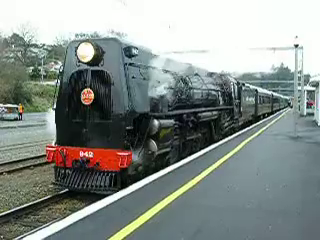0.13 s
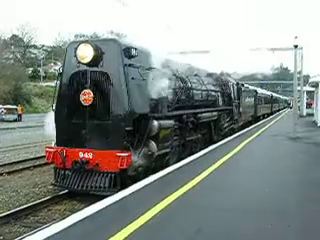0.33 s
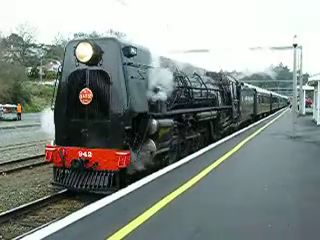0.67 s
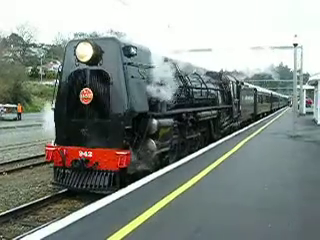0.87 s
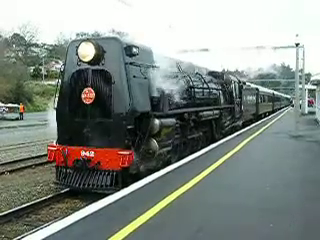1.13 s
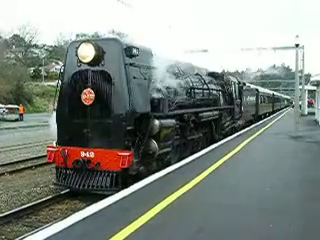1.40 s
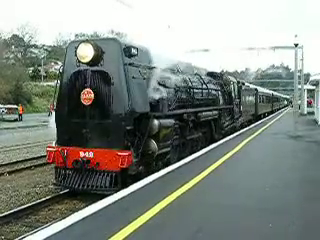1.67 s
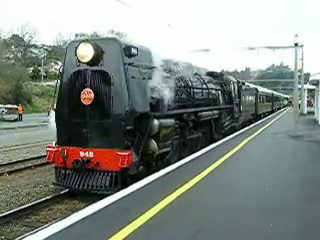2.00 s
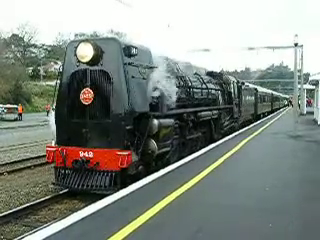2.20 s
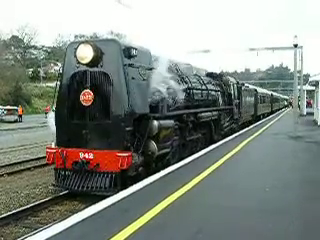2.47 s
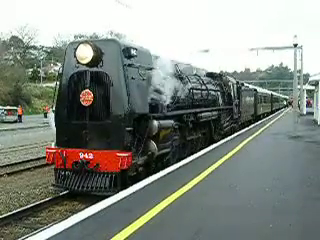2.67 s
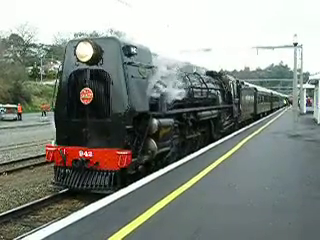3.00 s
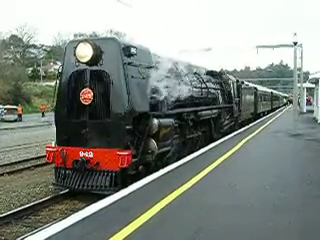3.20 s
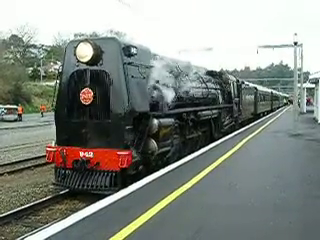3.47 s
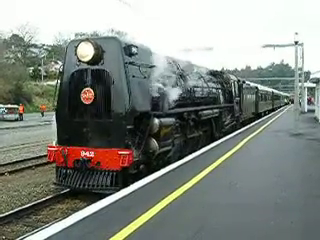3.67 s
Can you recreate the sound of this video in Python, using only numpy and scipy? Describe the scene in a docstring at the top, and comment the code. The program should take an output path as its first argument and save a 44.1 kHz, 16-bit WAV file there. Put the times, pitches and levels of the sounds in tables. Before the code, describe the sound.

A standing steam locomotive roars low and hisses steadily, with a faint whine.

```python
"""The draught roars in the chimney of a steam locomotive standing at a platform: a low roar,
a ringing flue and a brighter rush, all fluttering together. The fire rumbles underneath,
steam hisses from a leak and catches in brief whistles, and the turbo-generator whines
on the multiples of its shaft speed. A small camera listens; its microphone pops as it
powers up and opens a moment later with a thump."""
import sys
import numpy as np
from scipy import signal
from scipy.fft import rfft, irfft
from scipy.io import wavfile

SR = 44100
rng = np.random.default_rng(int(sys.argv[2]) if len(sys.argv) > 2 else 0)


def bounce(signal):
    """Save signal as a 16-bit WAV file at the path given by the first command-line argument."""
    frames = np.transpose(np.atleast_2d(signal))
    limited = np.clip(frames, -1, 1)
    pcm = np.round(limited * 32767).astype(np.int16)
    wavfile.write(sys.argv[1], SR, pcm)


N = 169785
TIME = np.arange(N) / SR

# How hard the draught pulls. Each row: time in seconds, level of the roar in dB.
DRAUGHT_LEVEL = [(.26, -26.5), (.35, -23.5), (.47, -24.5), (1.0, -25), (1.85, -24.5), (2.3, -25),
                 (2.5, -22.5), (2.7, -25), (3.1, -26), (3.44, -25.5), (3.53, -21), (3.65, -24), (3.85, -24)]
# The dark body of the roar. Each row: frequency in Hz, relative level in dB.
ROAR_SPECTRUM = [(25, -37), (48, -24.5), (80, -6), (128, -9.5), (158, -6), (205, 0.5), (315, -0.5),
                 (380, -4.5), (404, -9.5), (470, -14.5), (620, -15), (1000, -23.5), (2000, -49.5)]
# The ring of chimney and smokebox. Each row: pitch in Hz, width in Hz, level in dB at average draught.
FLUE_RESONANCES = [(364.9, 20, -31), (613, 38, -44), (766, 60, -39), (872, 130, -37), (979, 13, -44.5)]
# The brighter rush of steam leaving the chimney. Each row: frequency in Hz, relative level in dB.
RUSH_SPECTRUM = [(300, -16.5), (550, -3), (700, 2), (930, -0.5), (1060, -3), (1300, -7), (1650, -6),
                 (2150, -13), (3000, -18.5), (4300, -32)]
RUSH_DB = -34  # at average draught
FLUE_FOLLOW, RUSH_FOLLOW = 1.6, 0.95  # dB per dB of draught


def chimney(flutter):
    """The draught roars, rings the flue and rushes out; all three ride its surges and flutter."""
    draught_db = curve(DRAUGHT_LEVEL)
    surge_db = draught_db - draught_db.mean()
    roar = noise(ROAR_SPECTRUM) * amp(draught_db + 0.44 * flutter)
    flue = sum(amp(db) * ringing(hz, width) for hz, width, db in FLUE_RESONANCES)
    flue *= amp(FLUE_FOLLOW * surge_db + 1.3 * flutter)
    rush = noise(RUSH_SPECTRUM) * amp(RUSH_DB + RUSH_FOLLOW * surge_db + 0.61 * flutter)
    return roar + flue + rush


# The deep notes of the fire. Each row: pitch in Hz, width in Hz, level in dB before the swell.
FIRE_RESONANCES = [(85, 11, -42), (129.6, 34, -34.5)]
# The swell of the rumble. Each row: time in seconds, gain in dB.
FIRE_SWELL = [(.26, -3.5), (.5, 4), (1.05, -2.5), (1.3, 3.5), (1.53, -3), (2.0, 1.5), (2.58, -5.5),
              (2.72, 9), (2.95, -5), (3.15, 4), (3.38, -0.5), (3.55, -1), (3.85, 3.5)]


def fire():
    """The fire rumbles in two low resonances, swelling and sinking on its own."""
    rumble = sum(amp(db) * ringing(hz, width) for hz, width, db in FIRE_RESONANCES)
    return rumble * amp(curve(FIRE_SWELL))


# How hard the leak blows. Each row: time in seconds, level of the hiss in dB.
JET_LEVEL = [(.26, -37.5), (.8, -37.5), (1.4, -37), (2.15, -37), (2.48, -37), (2.73, -41.5), (3.4, -42.5),
             (3.52, -38.5), (3.68, -41.5), (3.85, -39)]
# The colour of the hiss. Each row: frequency in Hz, relative level in dB.
HISS_SPECTRUM = [(900, -17), (1900, -3), (2200, -9), (2520, 0), (2960, -1), (3150, -7.5), (3550, -12),
                 (3760, -6), (3880, -21), (4150, -27), (4400, -37)]
# The fizzy top of the same leak. Each row: frequency in Hz, relative level in dB.
FIZZ_SPECTRUM = [(2000, -21), (3200, 1), (3750, 4.5), (3900, -4), (4150, -4), (4400, -21)]
FIZZ_DB, FIZZ_FOLLOW = -49, 2.2  # level with an average jet; dB of fizz per dB of hiss


def steam_leak(flutter):
    """Steam hisses from a leak by the boiler, sputtering slightly; a harder jet is brighter."""
    jet_db = curve(JET_LEVEL)
    hiss = noise(HISS_SPECTRUM) * amp(jet_db)
    fizz = noise(FIZZ_SPECTRUM) * amp(FIZZ_DB + FIZZ_FOLLOW * (jet_db - jet_db.mean()))
    sputter_db = 0.25 * flutter + 0.34 * wander(rate_hz=60)
    return (hiss + fizz) * amp(sputter_db)


# Brief whistles in the steam.
# Each row: centre in seconds, length in seconds, pitch in Hz, width in Hz, level at the crest in dB.
STEAM_WHISTLES = [(1.203, 0.021, 838, 80, -26), (2.263, 0.036, 905, 25, -27.5),
                  (2.541, 0.028, 860, 25, -25.5), (2.815, 0.013, 812, 120, -29.5),
                  (3.345, 0.028, 1885, 120, -34.5), (3.518, 0.043, 1620, 20, -36)]


def steam_whistles():
    """The steam catches on a pitch for an instant: a fuzzy tone that swells and fades."""
    out = np.zeros(N)
    for centre, length, hz, width, db in STEAM_WHISTLES:
        pitch_hz = hz + width / 2 * wander(rate_hz=180)
        tone = np.sin(2 * np.pi * np.cumsum(pitch_hz) / SR)
        swell = np.exp(-(2 * (TIME - centre) / length) ** 2)
        out += amp(db) * unit(tone) * swell
    return out


# The almost steady spin of the turbine. Each row: time in seconds, speed in turns per second.
SHAFT_SPEED = [(0, 70.05), (2.2, 70.07), (2.45, 70.25), (3.85, 70.15)]
# The partials of the whine.
# Each row: multiple of the shaft speed, level in dB at WHINE_MID_S, drift in dB per second.
WHINE_PARTIALS = [(22, -50, 2.7), (23, -47, 1.5), (25, -56, -0.5), (26, -52, -0.3), (30, -42.5, -1.86),
                  (31, -50.5, 1), (33, -50.5, -1), (34, -52, 0.5), (35, -58, 0.5), (38, -52.5, 2.4)]
WHINE_MID_S = 2


def generator():
    """The turbo-generator whines on wavering multiples of its shaft speed, beside one thin tone."""
    speed = curve(SHAFT_SPEED) * (1 + 0.00062 * wander(rate_hz=23))
    turns = np.cumsum(speed) / SR
    out = amp(-49.5) * ringing(hz=1484, width_hz=8.7)
    for multiple, db, drift in WHINE_PARTIALS:
        level_db = db + drift * (TIME - WHINE_MID_S) + wander(rate_hz=6.3)
        out += amp(level_db) * np.sqrt(2) * np.sin(2 * np.pi * multiple * turns)
    return out


def power_up_pop(start_s):
    """The microphone pops as it powers up: a sharp, flat-topped pulse with a quick tail."""
    release_s = start_s + 0.00145
    held = (TIME >= start_s) & (TIME < release_s)
    return -0.69 * (held + 0.53 * decay(release_s, fall_s=0.0013))


# The hiss of the camera's electronics. Each row: frequency in Hz, relative level in dB.
IDLE_SPECTRUM = [(100, 0), (900, -1.5), (2300, 0.5), (4000, -3.5), (5000, -39.5)]


def idle_hiss():
    """The electronics hiss and whistle faintly, on the small offset where the pop settles."""
    hiss = amp(-56.5) * noise(IDLE_SPECTRUM)
    whistle = amp(-60) * ringing(hz=1158, width_hz=34)
    return hiss + whistle - 0.011


def amp(db):
    """Decibels to gain."""
    return 10 ** (np.asarray(db) / 20)


def unit(x):
    """Scales to rms 1."""
    return x / np.sqrt(np.mean(x ** 2) + 1e-20)


def curve(points):
    """Joins (time, value) points by straight lines."""
    return np.interp(TIME, *np.transpose(points))


def decay(start_s, fall_s):
    """A step that leaks away."""
    return (TIME >= start_s) * np.exp(-np.maximum(TIME - start_s, 0) / fall_s)


def noise(spectrum):
    """Noise of rms 1 with the given spectrum."""
    hz, db = np.transpose(spectrum)
    f = np.fft.rfftfreq(N, 1 / SR)
    gain = amp(np.interp(np.log(f + 1), np.log(hz), db))
    return unit(irfft(rfft(rng.standard_normal(N)) * gain, N))


def wander(rate_hz):
    """Random drift of rms 1, with motion up to about the given rate."""
    f = np.fft.rfftfreq(N, 1 / SR) / rate_hz
    return unit(irfft(rfft(rng.standard_normal(N)) * f / (.1 + f) / (1 + f ** 4), N))


def ringing(hz, width_hz):
    """Noise through one resonance, rms 1."""
    f = np.fft.rfftfreq(N, 1 / SR)
    return unit(irfft(rfft(rng.standard_normal(N)) / (1 + (2 * (f - hz) / width_hz) ** 2), N))


def lowpass(x, edge_hz):
    """Steep low-pass."""
    taps = signal.firwin(401, edge_hz, window=("kaiser", 8), fs=SR)
    return signal.oaconvolve(x, taps[None], "same")


def scene():
    """The standing locomotive, in mono; chimney and leak share one flutter."""
    flutter = wander(rate_hz=29)
    return (chimney(flutter) + fire() + steam_leak(flutter) + generator() + steam_whistles())[None]


def record(dry):
    """The microphone pops and idles, then its narrow-band input opens with a thump."""
    power_s, open_s, rise_s = 0.0725, 0.257, 0.00047
    opened = np.clip((TIME - open_s) / rise_s, 0, 1)
    thump = 0.19 * decay(open_s, fall_s=0.006)
    heard = opened * (dry + thump) + (TIME >= power_s) * idle_hiss()
    dulled = lowpass(heard, edge_hz=4260)
    return lowpass(dulled + power_up_pop(power_s), edge_hz=15800)


dry = scene()
out = record(dry)
bounce(out)
```